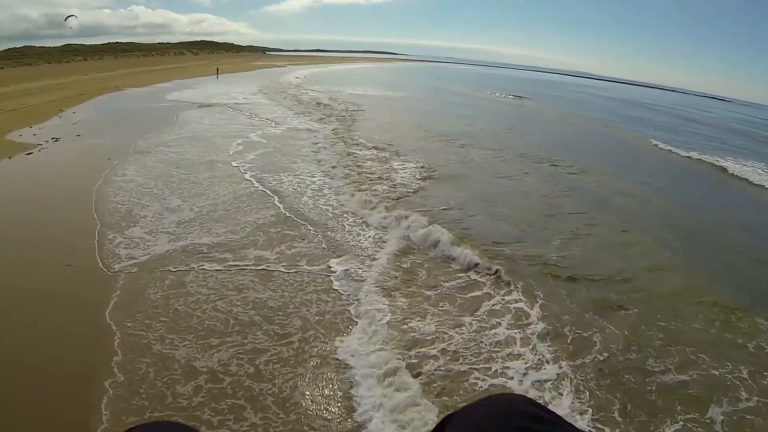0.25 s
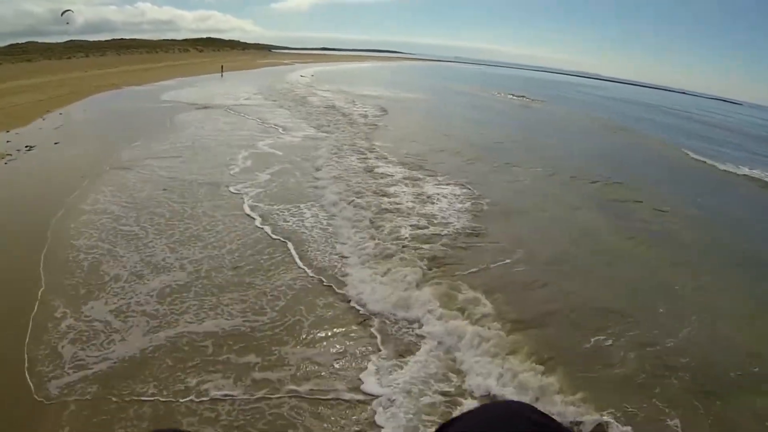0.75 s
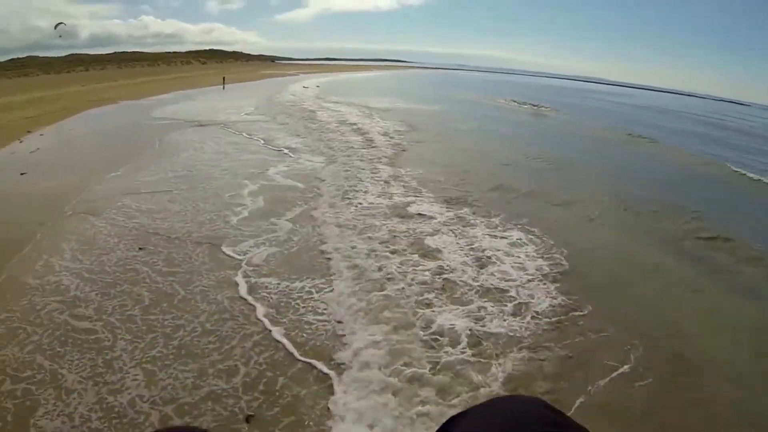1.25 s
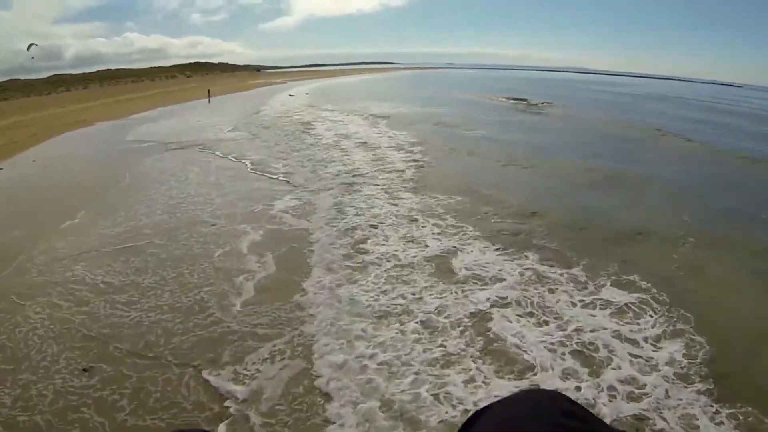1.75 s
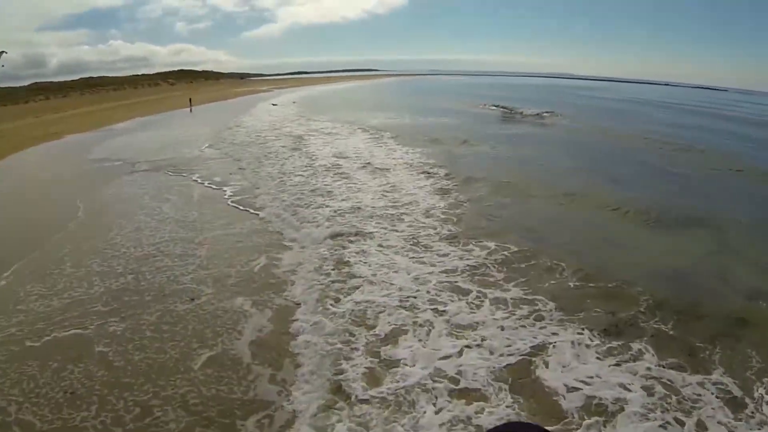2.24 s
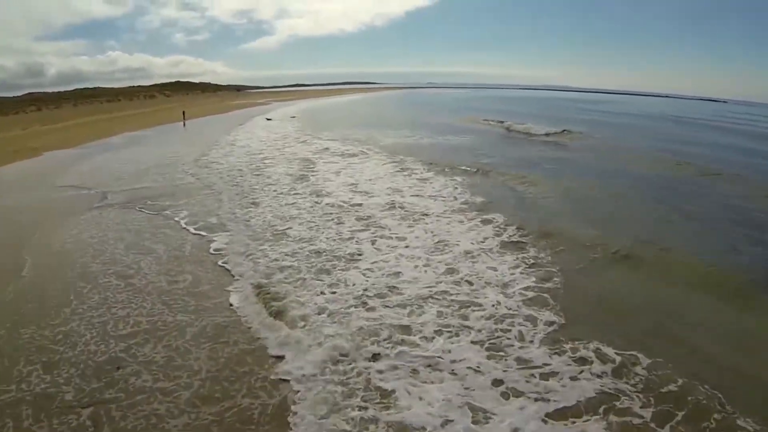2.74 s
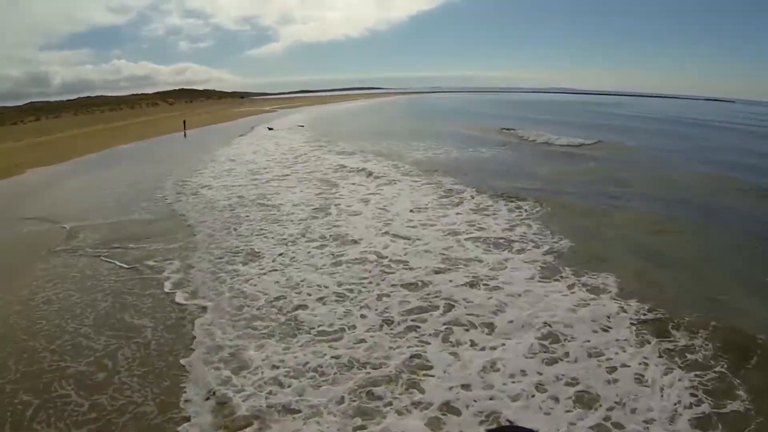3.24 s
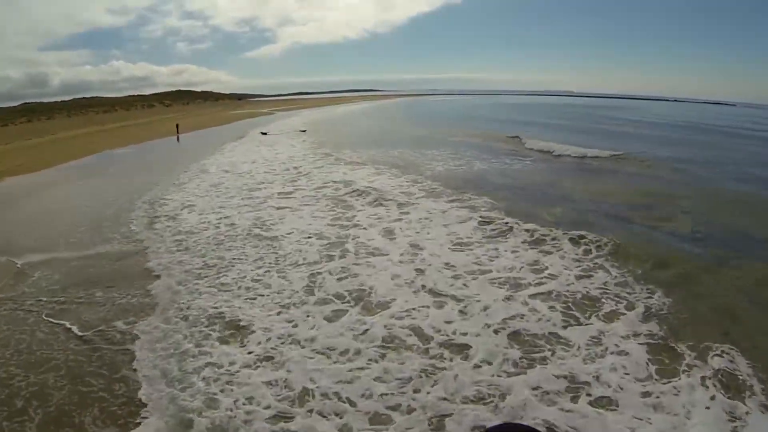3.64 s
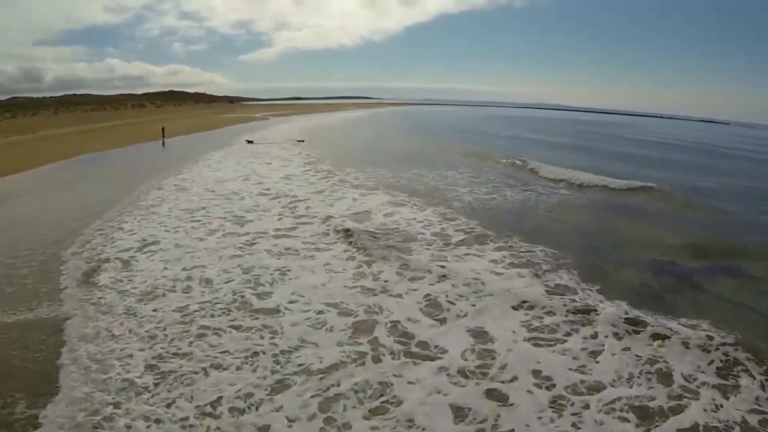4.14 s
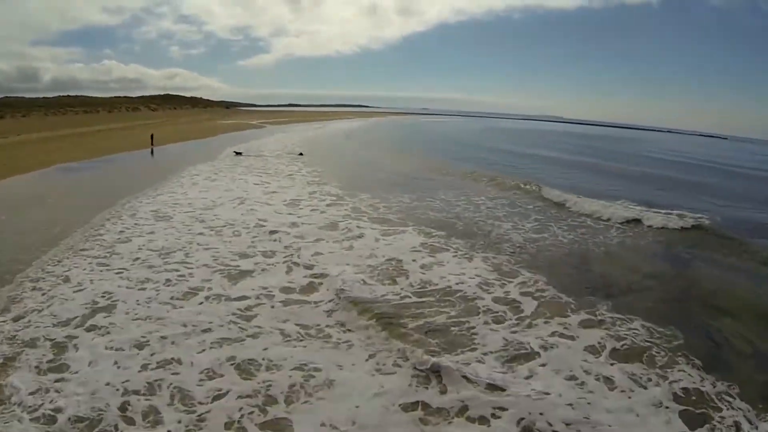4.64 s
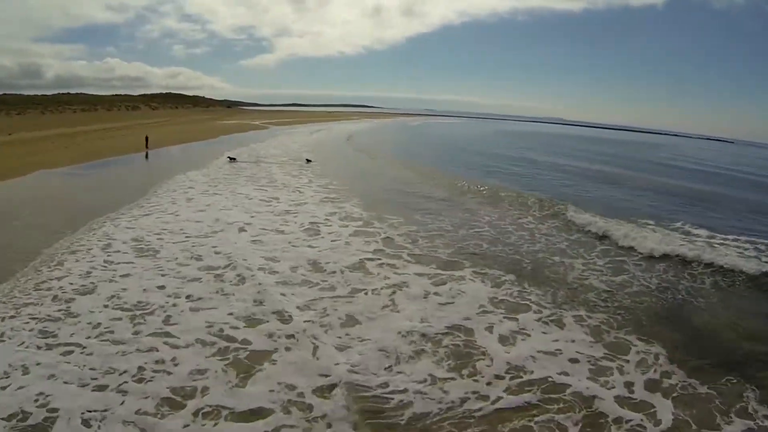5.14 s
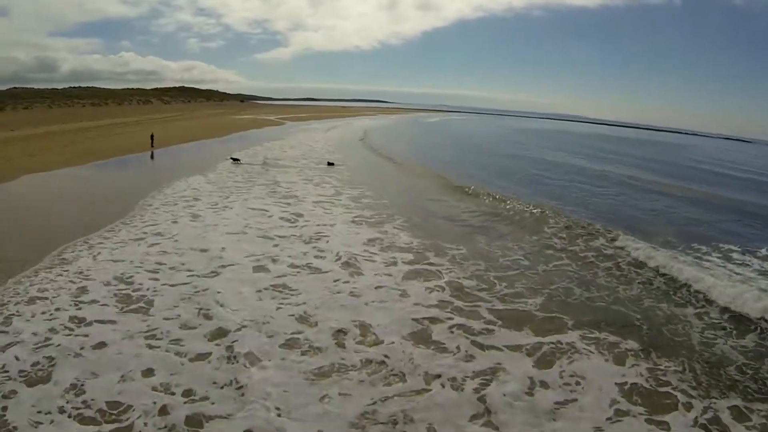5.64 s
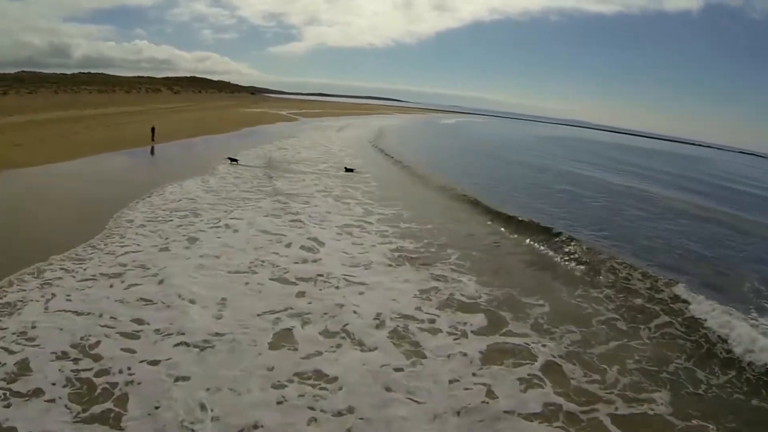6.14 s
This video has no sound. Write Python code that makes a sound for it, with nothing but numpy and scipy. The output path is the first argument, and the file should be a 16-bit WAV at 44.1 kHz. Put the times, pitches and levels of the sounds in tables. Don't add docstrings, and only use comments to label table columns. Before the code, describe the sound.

Close, muffled propeller and engine buzz with slowly swelling and fading tones, gusts thumping the microphone housing, pitch sagging slightly as everything finally dies down.

```python
import sys
import numpy as np
from scipy import signal
from scipy.fft import rfft, irfft, next_fast_len
from scipy.io import wavfile

SR = 44100
rng = np.random.default_rng(int(sys.argv[2]) if len(sys.argv) > 2 else 0)


def int16_out(signal):
    q = np.round(np.clip(np.atleast_2d(signal).T, -1, 1) * 32767)
    wavfile.write(sys.argv[1], SR, q.astype(np.int16))


def gain_from_decibels(decibels):
    exponent = np.asarray(decibels, float) / 20
    return 10 ** exponent


N = 281358


def in_time(rows):
    seconds, *columns = np.transpose(rows)
    return [np.interp(np.arange(N) / SR, seconds, column) for column in columns]


def drift(rate):
    memory = np.exp(-80 * np.pi * rate / SR)
    noise = rng.standard_normal(N // 40 + 2002)
    slow = signal.lfilter([1], [1, -2 * memory, memory * memory], noise)[2000:]
    return np.interp(np.arange(N) / 40, np.arange(len(slow)), slow / slow.std())


# time in seconds, blade passes per second in Hz.
BLADE_RATE = [(0.0, 65.83), (0.58, 65.84), (0.67, 65.49), (1.32, 65.36), (1.77, 65.78), (2.08, 65.64),
              (2.77, 65.01), (3.05, 65.14), (3.33, 64.69), (3.63, 64.83), (4.25, 64.32), (5.06, 64.5),
              (5.4, 64.22), (5.46, 64.01), (5.84, 64.49), (6.38, 63.6)]
# time in seconds, gain in Hz.
BELT_SLIP = [(0, .1), (1.3, .1), (1.6, .12), (3.3, .125), (3.6, .078), (5.0, .078), (5.2, .1), (6.38, .105)]


def angles():
    blade = -.75 + 2 * np.pi * np.cumsum(in_time(BLADE_RATE)[0]) / SR
    crank = blade + 2 * np.pi * np.cumsum(in_time(BELT_SLIP)[0]) / SR
    return blade, crank


# multiple of the blade rate, level in dB, growth in dB per second,
# share of the propeller load followed.
BLADE_TONES = [
    (1, -4.5, 0.19, .1),
    (2, 4.5, -1.15, .65),
    (3, 0.52, -0.15, 1.1),
    (4, -7.0, 0.42, .01),
    (5, -21, 1.1, .01),
    (6, -9, -4, 0.95),
]
BLADE_LEADS = (-.53, -.15, 0, -.06, -2.32, -1.92)
# multiple of the blade rate, multiple of the crank's slip, level in dB,
# growth in dB per second.
EXHAUST_TONES = [
    (2, 2, -5.5, -0.46),
    (4, 4, -0.65, 1.12),
    (5, 4, -20, 1.8),
    (6, 6, -14, -0.64),
]
EXHAUST_LEADS = (1.43, 1.9, .12, 2.43)
# time in seconds, shift in radians.
EXHAUST_SWAY = [(0, -.04), (1, .073), (1.5, .032), (2, -.097), (2.6, -.09), (3, .09), (3.4, -.03),
                (6.38, .03)]


def low_tones(blade, crank, load_db):
    seconds = np.arange(N) / SR
    slid = 1.08 * (crank - blade) + in_time(EXHAUST_SWAY)[0]
    out = np.zeros(N)
    for (k, db, growth, share), lead in zip(BLADE_TONES, BLADE_LEADS):
        level_db = db + growth * seconds + share * load_db + 0.23 * drift(8.0)
        out += gain_from_decibels(level_db) * np.cos(round(k) * blade + lead)
    for (k, m, db, growth), lead in zip(EXHAUST_TONES, EXHAUST_LEADS):
        out += gain_from_decibels(db + growth * seconds) * np.cos(round(k) * blade + round(m) * slid + lead)
    return np.sqrt(2) * out


# multiple of the blade rate, level in dB.
UPPER_TONES = [(7, -15.5), (8, -18.5), (9, -19.5), (10, -17), (11, -17.5), (12, -18.5), (13, -16),
               (14, -15), (15, -23.5), (16, -18.5), (17, -24.5), (18, -26.5), (19, -26), (20, -24.5),
               (21, -25), (22, -24.5), (23, -26.5), (24, -17.5), (25, -24), (26, -13.5), (27, -18.5),
               (28, -21), (29, -23), (30, -20), (31, -30.5), (32, -30), (33, -36.5), (34, -37), (35, -32.5),
               (36, -37)]
# multiple of the blade rate, level in dB.
WHINE = [(56, -42), (76, -49)]
# multiple of the blade rate, blades over firing in dB.
BLADE_SHARE = [(8, -2), (12, -3), (14, -7), (16, -3), (24, -1), (26, -6), (30, -2)]


def upper_tones(blade, crank, shake_db):
    low_db, hum_db, ring_db = -0.5, -1, -1
    firing = crank + 1.377
    out = np.zeros(N)
    for order, level_db in list(UPPER_TONES) + list(WHINE):
        k = round(order)
        path = rng.uniform(0, 2 * np.pi)
        tone = np.cos(k * blade + path)
        if k % 2 == 0 and k < 55:
            share = gain_from_decibels(np.interp(k, *np.transpose(BLADE_SHARE)))
            tone = (share * tone + np.cos(k * firing + path)) / np.hypot(1, share)
        if k > 20:
            group_db = ring_db + shake_db
        elif k > 10:
            group_db = hum_db + 0.51 * shake_db
        else:
            group_db = low_db
        out += gain_from_decibels(group_db + level_db + 1.92 * drift(2.2)) * tone
    return np.sqrt(2) * out


def airflow(spectrum, patchy_db, rate):
    size = next_fast_len(N)
    octave = np.log2(np.maximum(np.arange(size // 2 + 1) * SR / size, 1))
    hz, level_db = np.transpose(spectrum)
    shape_db = np.interp(octave, np.log2(hz), level_db, left=-90, right=-90)
    colour = rfft(rng.standard_normal(size)) * gain_from_decibels(shape_db)
    out, together = np.zeros(N), drift(rate)
    for centre in np.arange(np.floor(np.log2(hz[0])), np.log2(hz[-1]) + 1):
        share = np.cos(np.clip(octave - centre, -1, 1) * np.pi / 2) ** 2
        flicker_db = patchy_db * (0.86 * together + drift(rate))
        out += irfft(colour * share, size)[:N] * gain_from_decibels(flicker_db)
    return out / out.std()


# pitch in Hz, level in dB per Hz.
WASH_COLOUR = [(30, 0), (300, 3.5), (600, -1.5), (880, 1.5), (1350, -9.5), (1800, -2.5), (2050, -6),
               (2600, -23.5), (3200, -20.5), (4400, -34.5), (5100, -30), (5800, -41), (6200, -39),
               (7000, -47.5)]


def propeller_wash(blade):
    beat = 1 + .07 * np.cos(blade) + .08 * np.cos(2 * blade - 1.7) + .07 * np.cos(4 * blade)
    return gain_from_decibels(-5) * airflow(WASH_COLOUR, patchy_db=0.64, rate=7.4) * beat


def rattle(blade, crank):
    hz, level_db = np.transpose(WASH_COLOUR)
    out = np.zeros(N)
    wander = [gain_from_decibels(3.1 * drift(2.1)) for _ in range(7)]
    for first, angle, loss_db in ((37, blade, 4.5), (38, crank, 0)):
        turn = np.exp(1j * first * angle).astype(np.complex64)
        step = np.exp(2j * angle).astype(np.complex64)
        for k in range(first, 92, 2):
            colour_db = np.interp(np.log(k * BLADE_RATE[0][1]), np.log(hz), level_db) - loss_db
            path = np.complex64(gain_from_decibels(colour_db - 19.5) * np.exp(2j * np.pi * rng.random()))
            out += wander[k % 7] * (path * turn).real
            turn = turn * step
    return out


# pitch in Hz, level in dB per Hz.
BUFFET_COLOUR = [(12, -10), (30, -1.5), (90, -7.5), (200, -11), (500, -18.5), (1200, -53)]
# time of the peak in seconds, level in dB.
GUSTS = [(.15, -6.5), (.55, -16), (.87, -10), (1.26, -4.5), (1.7, -7.5), (2.3, -5.5), (2.52, -4),
         (2.8, -10), (3.1, -1), (3.9, -10), (4.3, -3.5), (4.6, -0.5), (4.85, -7.5), (5.15, -3.5),
         (5.45, -5), (5.8, -8)]


def wind_buffet():
    seconds = np.arange(N) / SR
    lull_db, gust_s = -14.5, 0.12
    power = gain_from_decibels(2 * lull_db)
    for at, db in GUSTS:
        power = power + gain_from_decibels(2 * db) * np.exp(-((seconds - at) / gust_s) ** 2)
    return np.sqrt(power) * airflow(BUFFET_COLOUR, patchy_db=-1.2, rate=8.7)


# pitch in Hz, level in dB per Hz.
HISS_COLOUR = [(6000, -25), (7000, -13), (7700, -6), (8300, 0), (9000, -6), (9650, -12), (9900, -8),
               (10500, -10), (12400, -16), (12800, -7), (13500, -15), (14400, -19), (15100, -18),
               (15400, -32)]


def leaking_hiss(crank):
    puffs_db = .8 * np.cos(crank) + 2 * np.cos(2 * crank - 1.6) + 1.2 * np.cos(4 * crank)
    return gain_from_decibels(-43) * airflow(HISS_COLOUR, patchy_db=0.7, rate=20) * gain_from_decibels(puffs_db)


# time in seconds, propeller load in dB, shaking of the housing in dB.
LOAD = [
    (0, -3.5, 0.5),
    (1, -3, 2),
    (1.5, 0, 3),
    (2, 1.5, 2),
    (2.6, -0.5, 0),
    (3.0, .2, -5),
    (3.4, 0.4, -2),
    (4.8, 1.45, 0),
    (6.38, 1.7, -4.5),
]
# time in seconds, level in dB.
LOUDNESS = [(0.0, -14), (0.59, -12.4), (1.17, -16.5), (1.32, -18.0), (1.87, -19), (2.34, -16.5),
            (2.81, -16.5), (3.7, -22), (4.08, -23), (4.95, -22.3), (5.08, -22), (5.37, -25), (5.97, -28.5),
            (6.38, -29.5)]


def scene():
    blade, crank = angles()
    load_db, shake_db = in_time(LOAD)
    tones = low_tones(blade, crank, load_db) + upper_tones(blade, crank, shake_db)
    high = propeller_wash(blade) + rattle(blade, crank)
    wind = wind_buffet() + leaking_hiss(crank)
    return (gain_from_decibels(in_time(LOUDNESS)[0]) * (tones + high + wind))[None]


def roll_off(x):
    return signal.sosfilt(signal.butter(12, 15300, fs=SR, output="sos"), x)


def record(dry):
    over = np.maximum(np.abs(dry) - .85, 0)
    limited = dry - np.sign(dry) * (over - .16 * np.tanh(over / .16))
    return roll_off(np.clip(limited, -1, 1))


dry = scene()
out = record(dry)
int16_out(out)
```